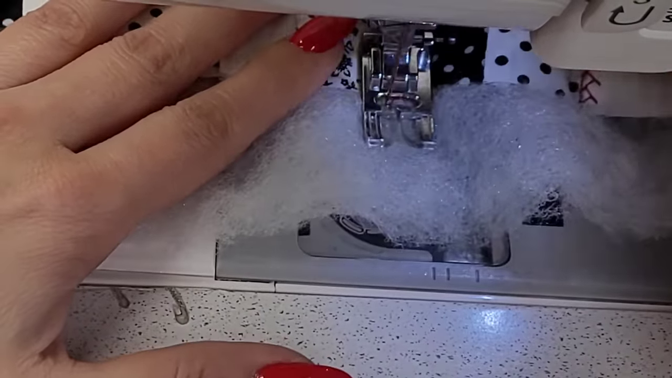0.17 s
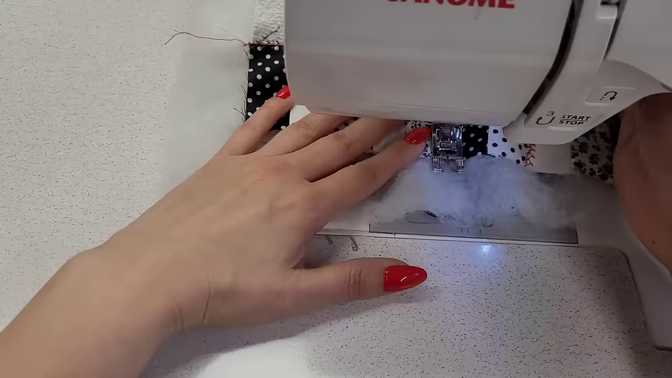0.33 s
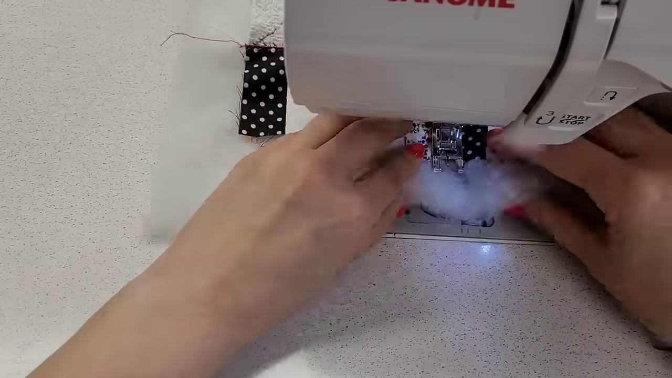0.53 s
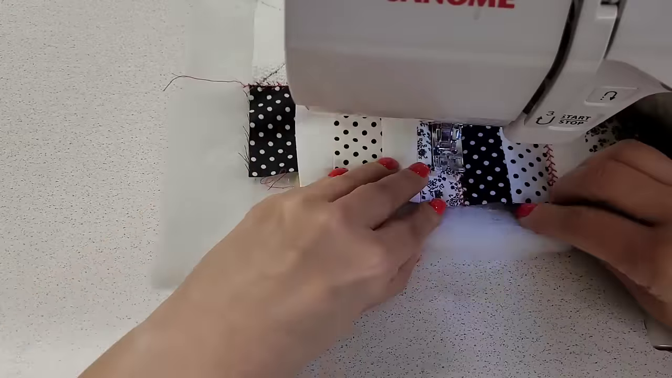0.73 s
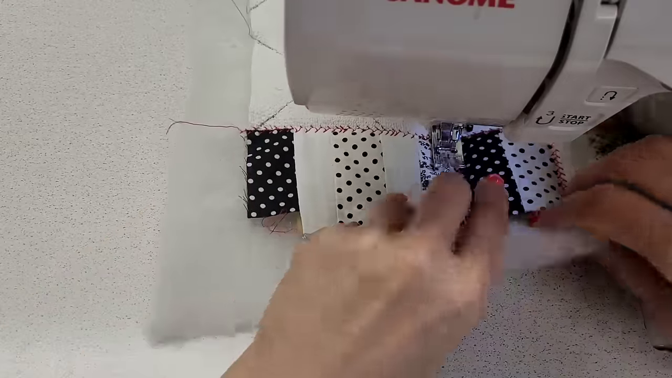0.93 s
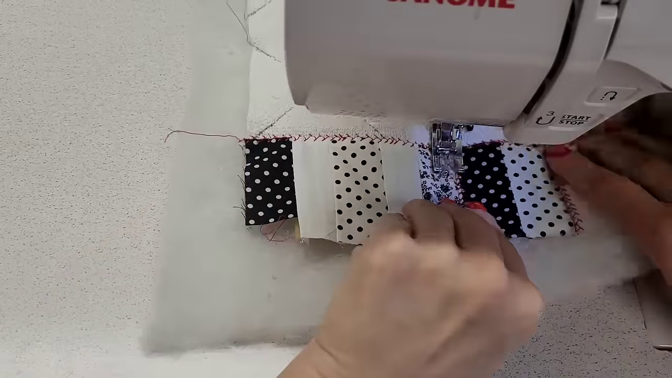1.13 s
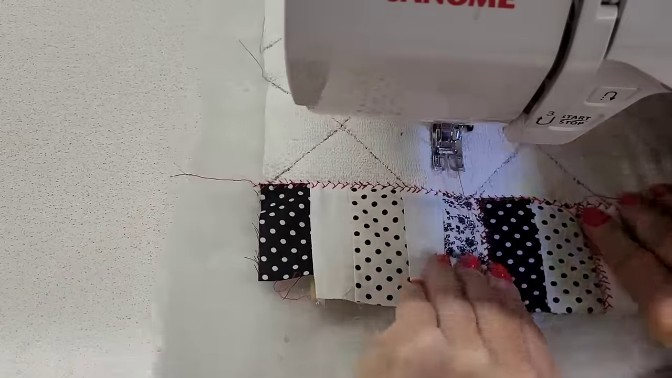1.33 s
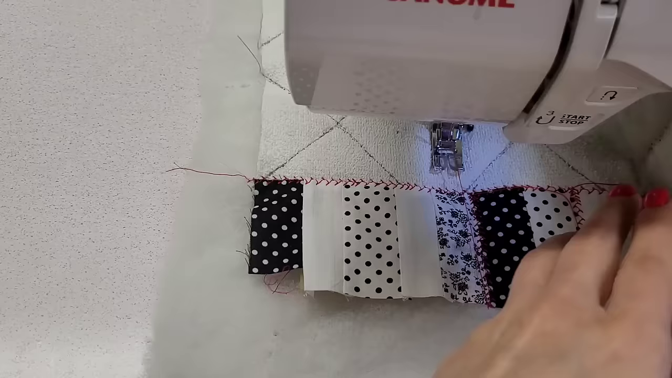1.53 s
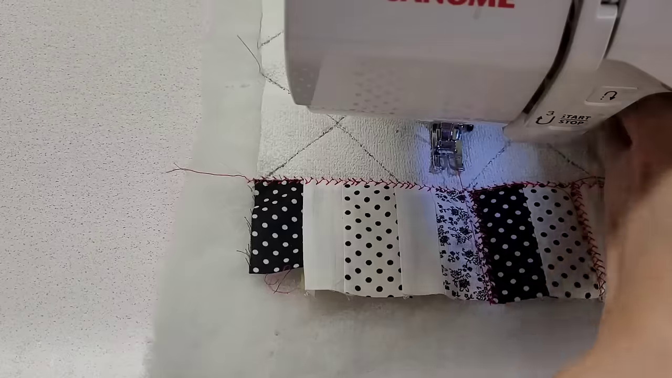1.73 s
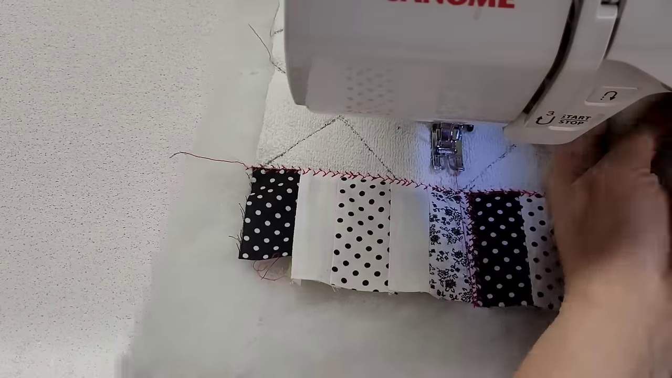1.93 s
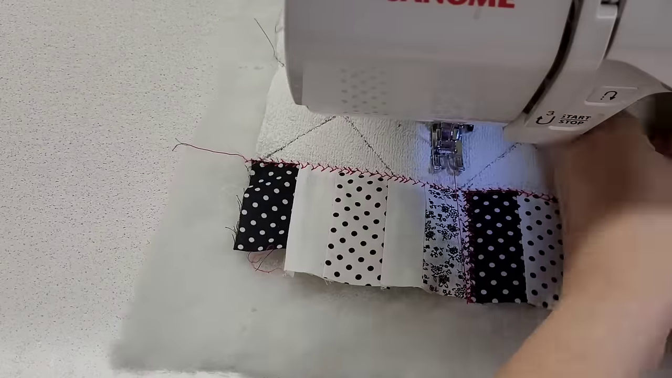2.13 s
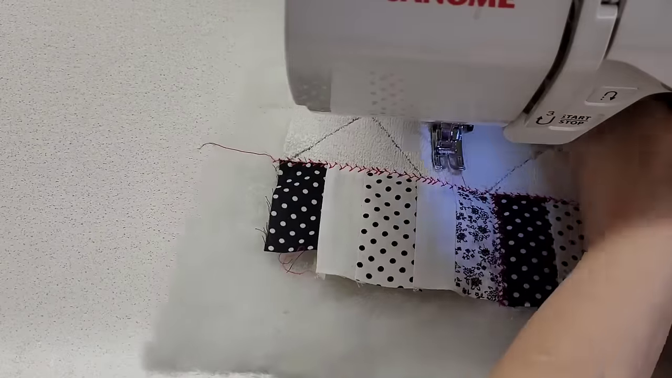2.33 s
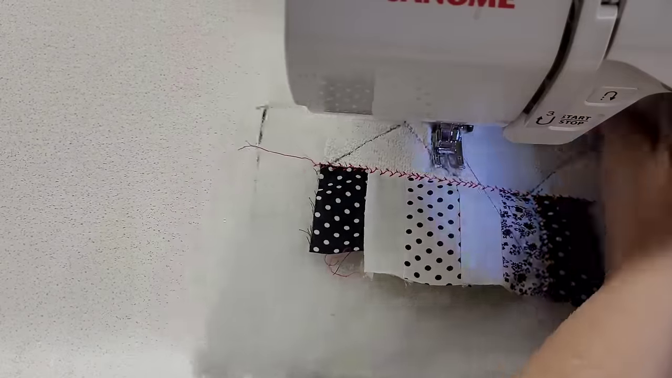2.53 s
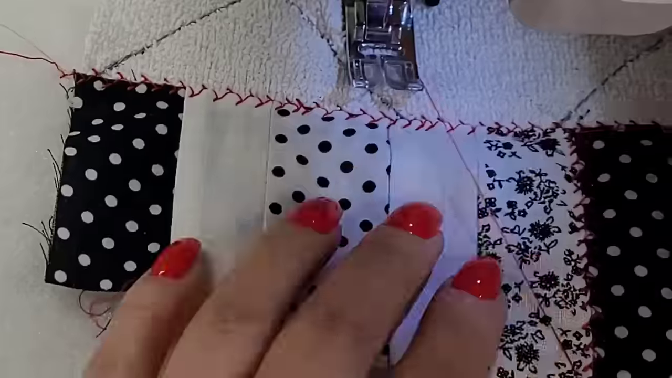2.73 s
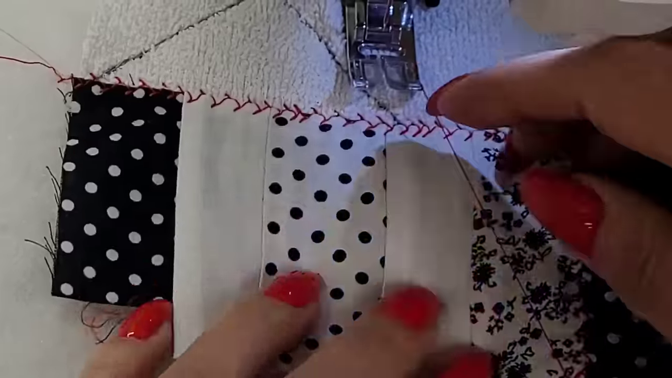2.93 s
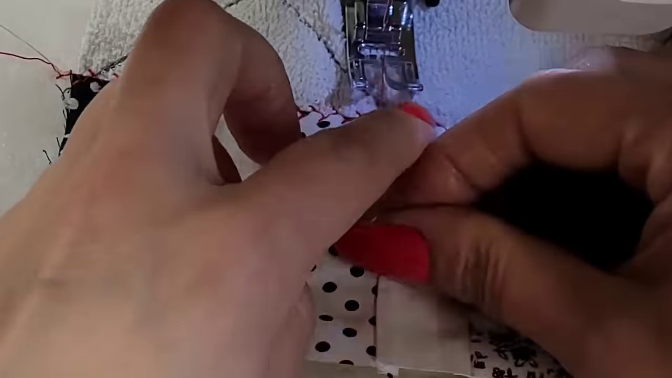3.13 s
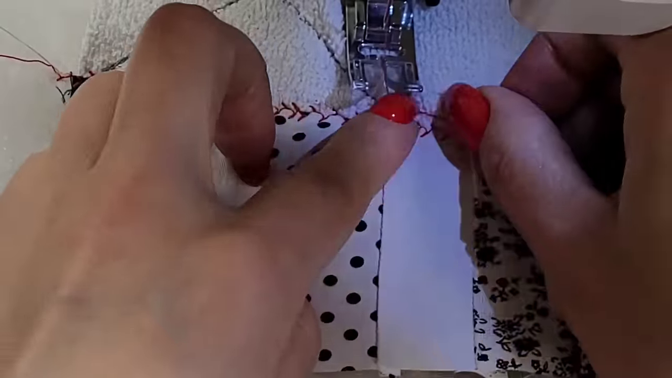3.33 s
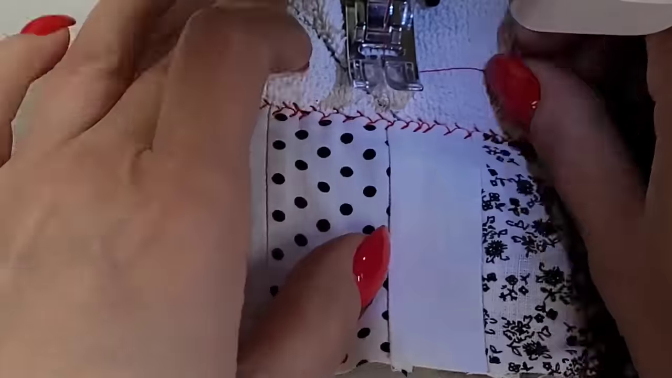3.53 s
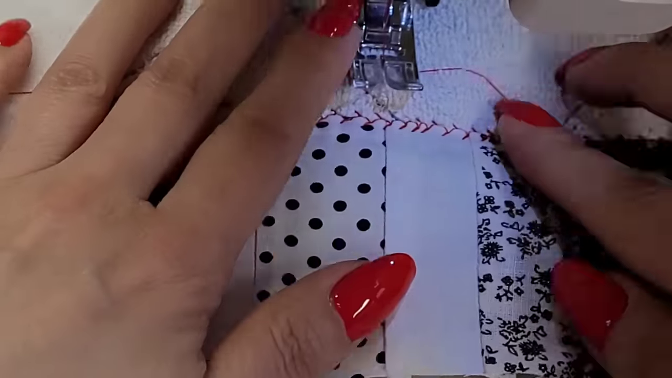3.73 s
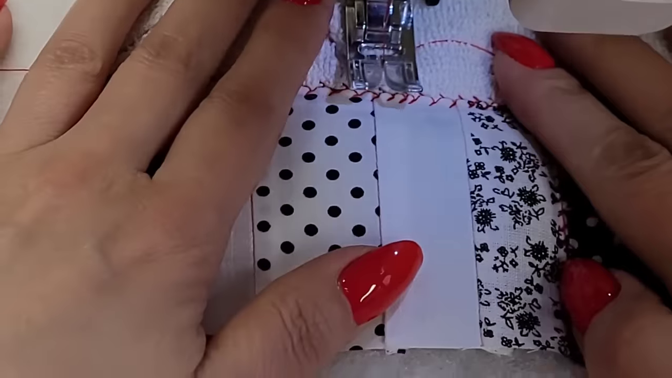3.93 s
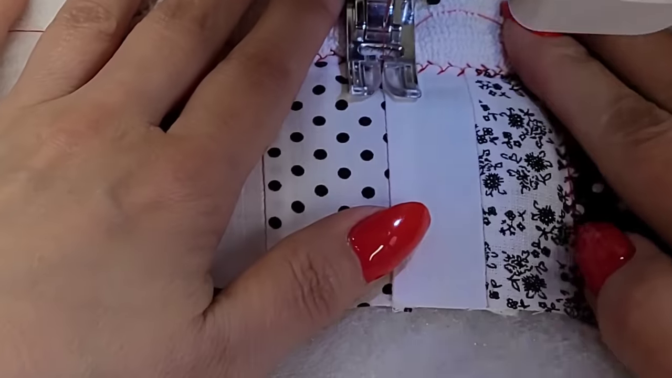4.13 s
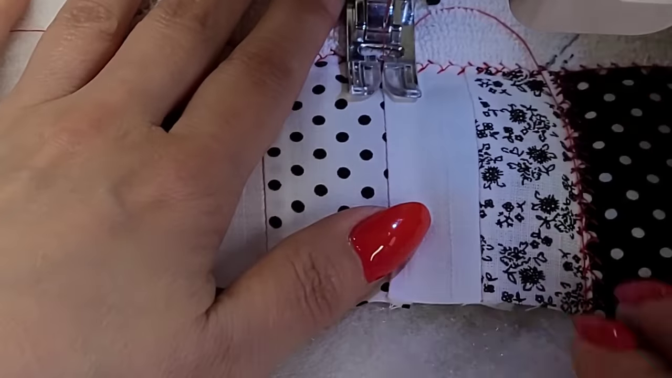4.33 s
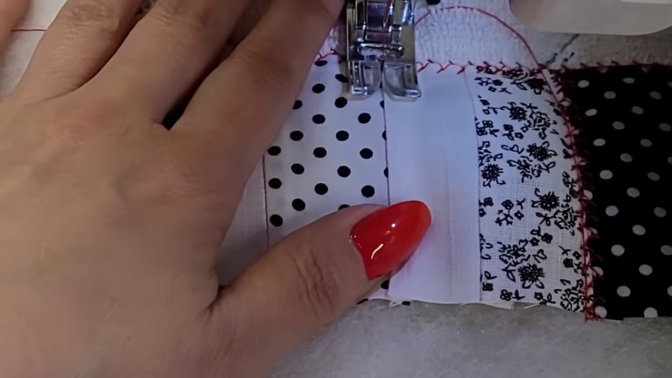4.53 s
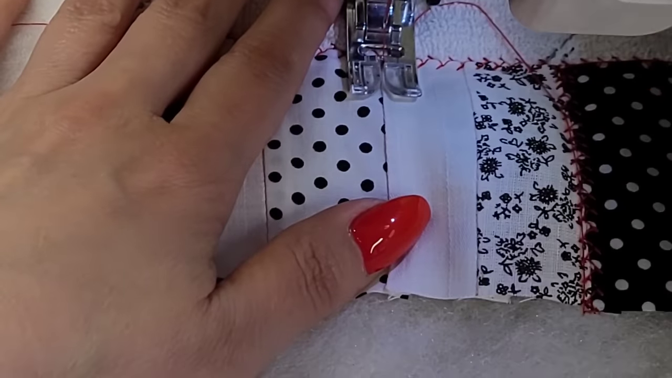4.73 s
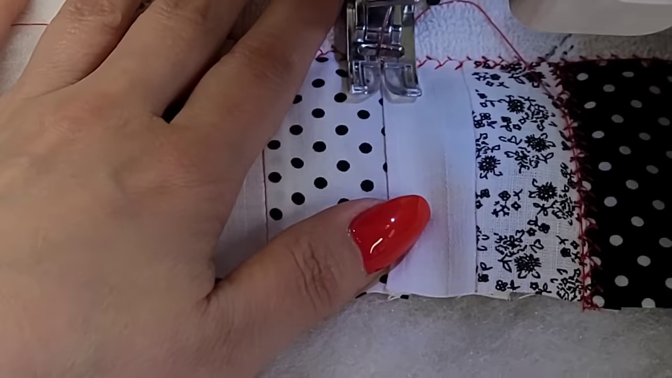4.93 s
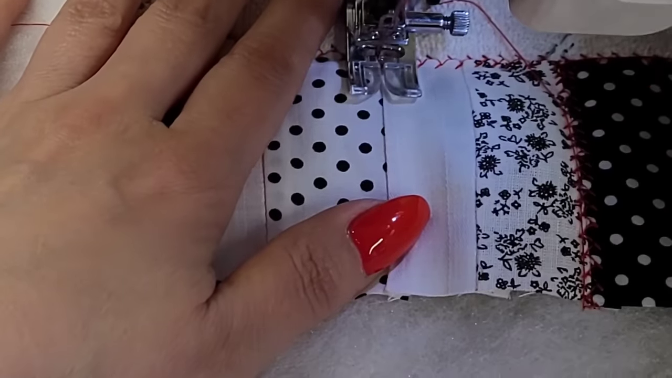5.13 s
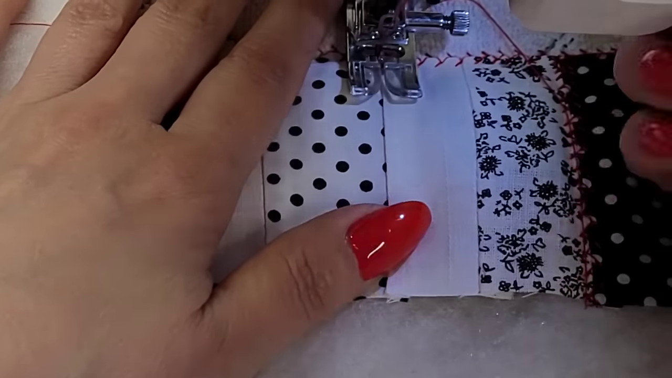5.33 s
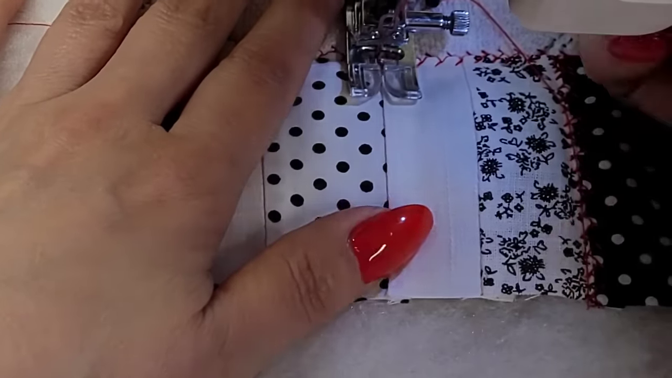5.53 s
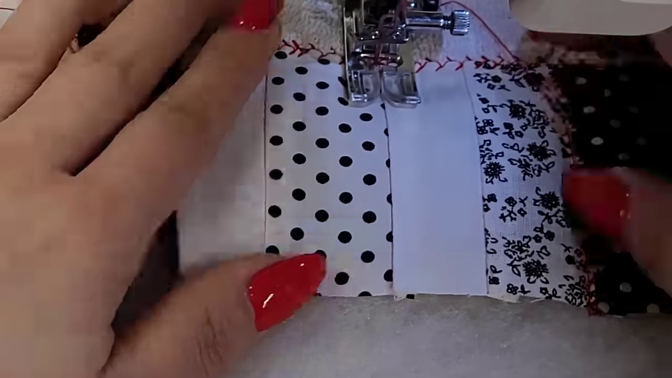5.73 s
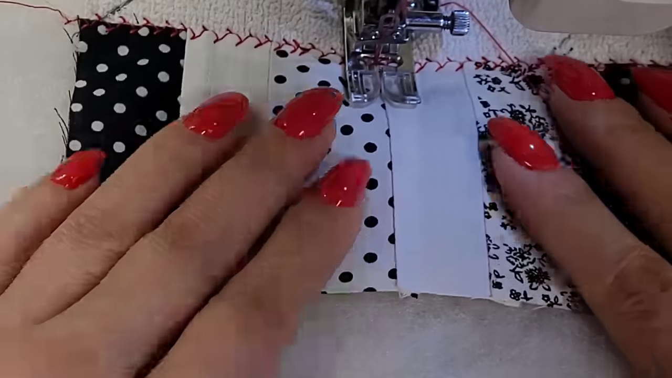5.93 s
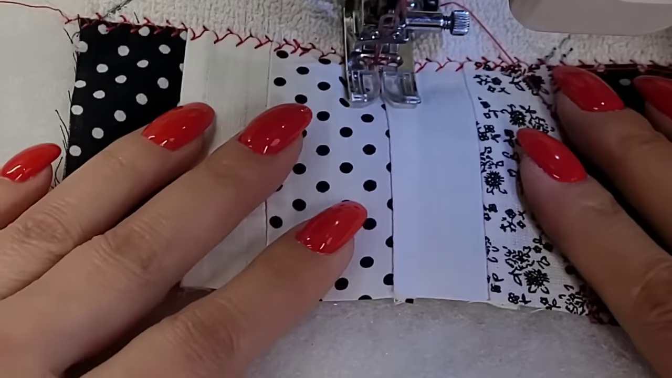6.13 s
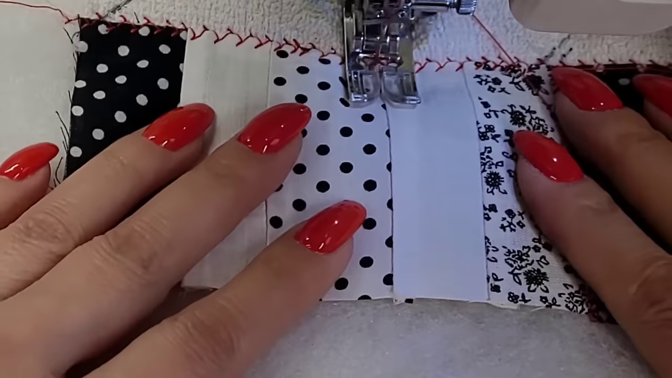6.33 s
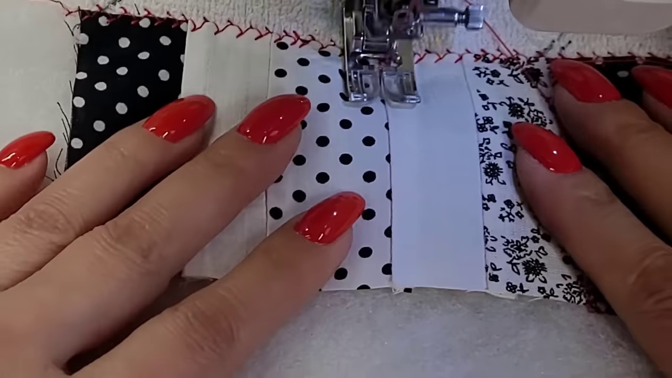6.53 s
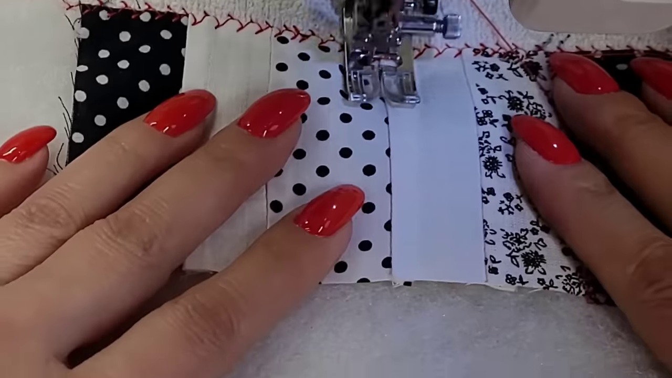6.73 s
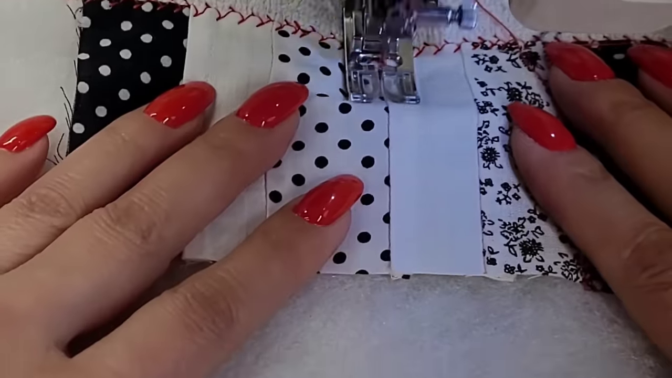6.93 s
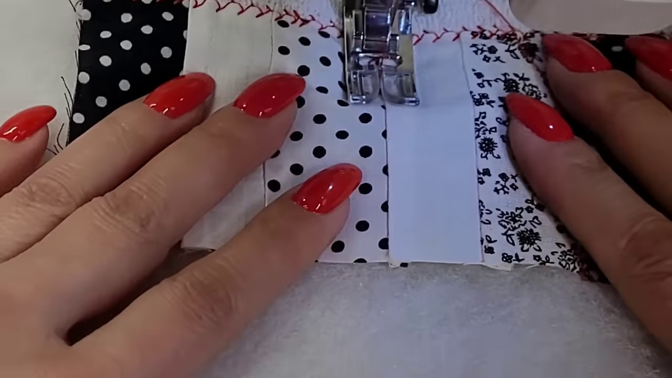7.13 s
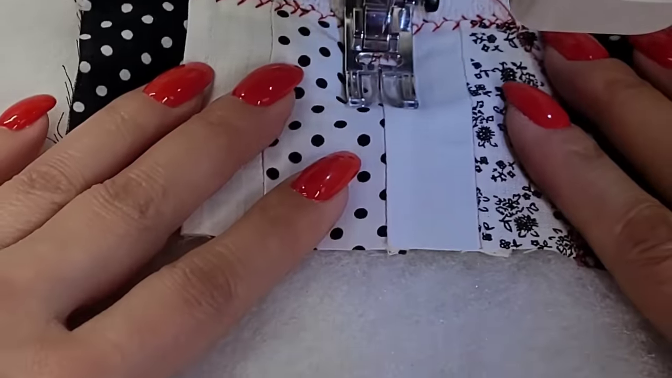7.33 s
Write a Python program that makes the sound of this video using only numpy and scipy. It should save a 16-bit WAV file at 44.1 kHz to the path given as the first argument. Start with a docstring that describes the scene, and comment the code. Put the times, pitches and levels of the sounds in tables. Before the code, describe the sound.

Close-up cloth scrapes, hard plastic and metal taps, a loud lever snap, then a domestic sewing machine clattering into steady stitching.

```python
"""A domestic sewing machine on a desk in a quiet room, heard from close by.
First hands drag a thick towel over the bed (friction noise in swelling pulls), while nails, levers and
the presser foot knock on the casing: impacts that ring its modes, with noise snaps and hard ticks.
A faint gliding sine hums from 3.3 s to 4.7 s; after 4 s the towel lies still between pulls. At 6.3 s the motor
engages with clunks: needle, feed and hook clatter over a noise-driven casing drone and a brief whine."""
import sys
import numpy as np
from scipy import signal
from scipy.io import wavfile

SR = 44100
rng = np.random.default_rng(int(sys.argv[2]) if len(sys.argv) > 2 else 0)


def materialize(psi):
    """Save the field psi as 16-bit PCM at rate SR to the path in sys.argv[1].

    A 1-D psi becomes a single channel; in a 2-D psi each row is a channel.
    """
    bounded = np.clip(np.atleast_2d(psi).T, -1, 1)
    quanta = np.round(bounded * 32767).astype(np.int16)
    wavfile.write(sys.argv[1], SR, quanta)


N = 325458

# sharp knocks by nail, lever and foot; the last three are clunks as the motor engages:
# [t/s, snap level/dB, casing thud level/dB, thud pitch f/Hz, brightness level/dB, snap t60 t/s,
# metal ring pitch f/Hz]
SHARP_KNOCKS = [(0.0094, -49, -37.5, 260, -14, 0.033, 1310), (0.2197, -52, -26.5, 301, -15, 0.091, 1390),
                (0.2764, -44, -41, 262, -14.5, 0.079, 1244), (0.319, -43, -34, 224, -12.5, 0.085, 1280),
                (0.3823, -65, -52, 458, -20, 0.12, 1250), (0.5234, -33, -39.5, 357, -13, 0.11, 1185),
                (0.5425, -38.5, -40.5, 387, -22, 0.066, 1290), (0.5726, -43, -35, 350, -21, 0.052, 1290),
                (0.7091, -49, -44, 284, -14, 0.31, 1400), (0.8949, -23.5, -37, 400, -15.5, 0.07, 2430),
                (1.0631, -24.5, -27.5, 367, -14, 0.061, 5560),
                (1.0868, -34.5, -41, 520, -13.5, 0.064, 1280), (1.1575, -50, -43.5, 254, -11, 0.14, 2870),
                (1.3765, -28, -37.5, 354, -12, .083, 1555), (1.4509, -38.5, -44, 390, -24, 0.073, 1280),
                (1.516, -26, -27.5, 267, -7.5, 0.098, 4320), (1.524, -24, -27.5, 583, -13.5, 0.086, 1730),
                (1.546, -36.5, -39, 444, -3, .041, 1700), (1.5722, -45.5, -45, 331, 0, .04, 1900),
                (1.6986, -26.5, -39.5, 467, -14.5, .098, 2430), (1.7762, -49, -44.5, 416, -13, .063, 1450),
                (1.935, -22.5, -31.5, 466, -16.5, 0.066, 1216),
                (1.9922, -20.5, -37.5, 297, -9, 0.049, 4620), (2.165, -20.5, -28, 274, -12, 0.078, 2660),
                (2.276, -39, -60, 266, -4, 0.048, 5680), (2.3903, -42.5, -54, 340, -1, 0.036, 7650),
                (2.4635, -49.5, -51.5, 333, -3, 0.098, 1220), (2.748, -61.5, -46.5, 280, -32, 0.078, 1360),
                (2.849, -58, -51, 363, -14, 0.37, 1660), (2.996, -53, -73, 272, -4, 0.11, 4525),
                (3.3827, -45, -44, 285, -11, 0.027, 1360), (3.6005, -42, -45.5, 470, -3.5, 0.041, 5710),
                (3.6143, -45, -44.5, 304, -3, 0.097, 2620), (4.5454, -38, -49, 285, -1.5, 0.049, 6600),
                (4.696, -50, -50, 307, -14.5, 0.18, 1910), (4.715, -43, -50.5, 430, -3.5, 0.093, 4690),
                (4.7258, -50.5, -35.5, 246, -21.5, 0.051, 2720),
                (4.7573, -59, -48, 250, -15.5, 0.028, 2700), (4.9059, -35.5, -26, 616, -19, 0.089, 1220),
                (5.0067, -52.5, -41.5, 435, -26, 0.086, 1250), (5.0152, -53, -41, 263, -21, 0.067, 1270),
                (5.3386, -31, -38, 684, -12.5, .039, 4960), (5.3567, -22, -36, 630, -9.5, 0.038, 4880),
                (5.439, -54.5, -56.5, 437, -16.5, 0.097, 1500), (5.632, -48, -55, 496, -8, .05, 5600),
                (5.6493, -48, -41.5, 590, -15, .24, 1270), (5.671, -23.5, -20.5, 580, -12.5, .073, 3100),
                (5.683, -10, -30.5, 536, -3, 0.038, 6330), (6.2782, -64, -35, 261, -33, 0.14, 1240),
                (6.3066, -45.5, -30, 530, -36.5, 0.03, 1410), (6.39, -57, -25, 451, -31, 0.18, 1250)]
# needle bar, which turns twice a stitch, top and bottom in turn, and rebounds once: [t/s, snap level/dB,
# casing thud level/dB, thud pitch f/Hz, rebound delay t/s, rebound against the turn level/dB]
NEEDLE_TURNS = [(6.4511, -25, -27.5, 444, 0.011, -26), (6.478, -27.5, -31, 275, .012, -24),
                (6.542, -14, -30, 278, 0.017, -31), (6.5633, -31.5, -31, 290, .012, -23),
                (6.628, -20, -43, 266, 0.011, -24), (6.6565, -24, -27, 418, 0.015, 5),
                (6.728, -17.5, -33.5, 318, 0.011, -20), (6.744, -18.5, -28.5, 437, .0111, -2.5),
                (6.8114, -26, -38, 444, 0.01, -6), (6.8397, -23, -26, 444, .012, -16),
                (6.8958, -17.5, -27, 301, 0.0073, -30), (6.928, -26, -34, 303, .012, -2),
                (6.9791, -22, -36, 420, .012, -25), (7.0184, -23, -27, 477, 0.013, 3.2),
                (7.0682, -22, -20, 427, 0.0094, -7.5), (7.1126, -18, -30, 275, 0.016, -1),
                (7.1627, -17.5, -30, 590, 0.012, 4), (7.2028, -24, -42, 487, 0.013, -6),
                (7.2571, -21.5, -32, 427, .012, -11), (7.2972, -17, -21, 455, .012, -8),
                (7.3397, -17.5, -29, 299, 0.016, -3)]
# modes of the casing: [f/Hz, width f/Hz, level/dB]
CASING_MODES = [(256.6, 62.4, 0.5), (292.2, 44.2, 5.5), (338, 58.5, -1.5), (407.2, 28.5, -1),
                (434, 36.3, 1), (499.5, 34.5, 1), (561, 39.3, -4.5), (656, 37, -4.5), (790, 74, -13.5),
                (1011, 36, -14), (1210, 81, -19.5)]
# modes of foot, levers and needle bar: [f/Hz, width f/Hz, level/dB]
METAL_MODES = [(1235, 100, -10), (1420, 82, -5), (1698, 110, -6), (2350, 68, -15), (2670, 90, -19),
               (3175, 35, -5), (3930, 43, -6), (4450, 140, -10), (4776, 110, -1), (4870, 170, -11),
               (6700, 150, -8), (6520, 66, -13), (7060, 240, 4), (7500, 180, -11), (7800, 130, -11),
               (10400, 410, -4), (15600, 820, 8)]

PLAIN_BRIGHT_DB = -13   # brightness of a snap that has the plain spectrum
EDGES = 22 * 2 ** np.arange(0, 9.7, .4)   # noise band edges in Hz
CENTRES = np.sqrt(EDGES[1:] * EDGES[:-1])
STEP = 8   # samples per point of a snap envelope


def amp(db):
    """Level to amplitude: 20 dB are a factor of ten."""
    return 10 ** (np.asarray(db) / 20)


def rms_one(x):
    """Normalisation by mean power: scaled to rms 1."""
    return x / np.sqrt(np.mean(x ** 2) + 1e-20)


def in_time(rows):
    """Linear interpolation: each column as a curve over all samples."""
    s, *columns = np.transpose(rows)
    return [np.interp(np.arange(N) / SR, s, c) for c in columns]


def while_sounding(rows):
    """Gating: 1 between the first and last row, with 10 ms ramps."""
    first, last = rows[0][0], rows[-1][0]
    return np.interp(np.arange(N) / SR, [first - .01, first, last, last + .01], [0, 1, 1, 0])


def at_hz(points, hz):
    """Interpolation of a spectrum on a log-frequency axis."""
    return np.interp(np.log(hz), np.log(np.array(points)[:, 0]), np.array(points)[:, 1])


def drift(rate_hz):
    """Low-passed noise: a slow random fluctuation of spread 1."""
    hop = 40   # samples between computed points
    r = np.exp(-2 * np.pi * hop * rate_hz / SR)
    white = rng.standard_normal(N // hop + 2002)
    slow = signal.lfilter([1], [1, -2 * r, r * r], white)[2000:]   # settled part only
    return np.interp(np.arange(N) / hop, np.arange(len(slow)), rms_one(slow))


def resonance(x, hz, width_hz):
    """A damped mode: two-pole peak of gain 1."""
    r = np.exp(-np.pi * width_hz / SR)
    poles = [1, -2 * r * np.cos(2 * np.pi * hz / SR), r * r]
    return signal.lfilter([(1 - r * r) / 2, 0, (r * r - 1) / 2], poles, x)


def stereo(mid, side, hz):
    """Interaural coherence and level difference: left and right as alike and balanced as at this frequency."""
    # likeness of left and right: [f/Hz, correlation]
    likeness = [(60, 0.94), (250, 0.95), (600, 0.72), (1200, 0.31), (3000, 0.11), (12000, 0.4)]
    # the machine stands to the right, its treble shaded on the left: [f/Hz, left-right level/dB]
    balance = [(60, 2.5), (110, 2), (200, -2), (380, -1.5), (700, 0.5), (1290, -3), (2380, -3.0),
               (4400, -6), (8120, -3.5), (15000, -7.5)]
    alike, lean_db = np.clip(at_hz(likeness, hz), 0, 1), at_hz(balance, hz)
    pair = np.sqrt(1 + alike) * mid + np.sqrt(1 - alike) * side * [[1], [-1]]
    return pair * amp([[lean_db / 2], [-lean_db / 2]])


def noise_bands():
    """Filter-bank analysis: stereo noise split into bands, flat per Hz."""
    white = rng.standard_normal((2, 2, N))   # neighbouring bands draw on different noise
    cut = [signal.butter(2, edge, "band", fs=SR, output="sos") for edge in zip(EDGES, EDGES[1:])]
    return [stereo(*signal.sosfilt(sos, white[k % 2]), CENTRES[k]) for k, sos in enumerate(cut)]


def shares(spectrum):
    """Division of power by bandwidth: band gains that give the spectrum at rms 1."""
    gain = amp(at_hz(spectrum, CENTRES))
    return gain / np.sqrt(np.sum(gain ** 2 * np.diff(EDGES)) * 4 / SR)


def pings(s, level_db):
    """Impulse excitation: one click per blow."""
    out = np.full(N, 1e-18)
    out[(np.asarray(s) * SR).astype(int)] = amp(level_db)
    return out


def single_blows():
    """Single impacts: the sharp knocks, each with its ring dB against the snap as a last column."""
    # ring against a snap of -35 dB, and dB it gains per dB of snap
    ring_db, ring_share = -15, -0.083
    return [(*row, ring_db + ring_share * (row[1] + 35)) for row in SHARP_KNOCKS]


def mechanism():
    """Periodic impact: needle turns, rebounds and feed steps as blows, columns as the single blows."""
    # a turn's sound, top then bottom: [brightness level/dB, snap t60 t/s, metal ring pitch f/Hz,
    # ring against the snap level/dB]
    turn_sound = [(-17.5, 0.047, 4300, -21), (-16.5, 0.066, 4400, -18.5)]
    # a feed step's sound: columns as the turns
    feed_sound = (-16, -1.5, 4400, -23)
    # the feed steps after each bottom turn, and is heard less once the machine runs
    feed_delay_s, feed_snap_db, feed_thud_db = .032, -26, -29
    feed_hz, feed_fade_db_per_s = 286, -18
    blows = []
    for k, (s, snap_db, thud_db, thud_hz, delay, rebound_db) in enumerate(NEEDLE_TURNS):
        sound = turn_sound[k % 2]
        blows.append((s, snap_db, thud_db, thud_hz, *sound))
        blows.append((s + delay, snap_db + rebound_db, thud_db + rebound_db, thud_hz, *sound))
        if k % 2:
            fade_db = feed_fade_db_per_s * (s - NEEDLE_TURNS[0][0])
            blows.append((s + feed_delay_s, feed_snap_db + fade_db, feed_thud_db + fade_db,
                          feed_hz, *feed_sound))
    return blows


def snap_envelopes(rows, spectrum, crack_db, crest_db, rise_s, tail_db=-31.5, tail_t60=0.2):
    """Frequency-dependent damping: power of a crack, a rattle dying faster in the treble, the room's tail."""
    count = 1400
    power = np.zeros((len(CENTRES), N // STEP + 2000))
    age = np.arange(count) * STEP / SR
    octaves, rise = np.log2(CENTRES / 4500)[:, None], (1 - np.exp(-age / rise_s)) ** 2
    for s, peak_db, _, _, bright_db, t60, _, _ in rows:
        t60_band = max(t60, .01) * 2 ** (-.35 * octaves)   # as listed at 4500 Hz
        tilt_db = (bright_db - PLAIN_BRIGHT_DB) * 0.7 * np.clip(octaves, -1.5, 1.5)
        level = shares(spectrum)[:, None] * amp(peak_db - crest_db + tilt_db)
        crack = crack_db - 60 * age / 0.009
        rattle = -60 * age / t60_band
        tail = tail_db - 60 * age / tail_t60
        at = int(s * SR / STEP)
        power[:, at:at + count] += level ** 2 * rise * (amp(crack) ** 2 + amp(rattle) ** 2 + amp(tail) ** 2)
    return power


def knock_envelopes(single):
    """Broadband impact noise: band power of the sharp knocks' snaps."""
    # [f/Hz, level per Hz/dB]
    snap_spectrum = [(470, -9.5), (800, -3), (2180, -6), (2870, -5.5), (6970, -12), (9100, -11),
                     (11400, -14.5), (15100, -25.5), (16500, -39)]
    return snap_envelopes(single, snap_spectrum, crack_db=0.5, crest_db=11.5, rise_s=0.00054)


def contact_envelopes(by_machine):
    """Broadband impact noise: band power of the mechanism's snaps."""
    # [f/Hz, level per Hz/dB]
    clatter_spectrum = [(470, -14), (800, -6), (2730, -19), (3940, -9), (5920, -21.5), (7150, -9),
                        (12800, -15.5), (15300, -25), (16500, -32)]
    return snap_envelopes(by_machine, clatter_spectrum, crack_db=4.5, crest_db=14.5, rise_s=0.0011)


def strike(modes, s, level_db, pitch_hz, reach, far_db, contact_hz):
    """Modal excitation: a blow rings all modes, most those near the struck pitch; long contacts are dull."""
    under_db_per_octave = -4   # modes below the place struck answer less
    at, out = (s * SR).astype(int), np.zeros((2, N))
    chance = rng.normal(0, 1, (len(s), len(modes), 2))
    for k, (hz, width, db) in enumerate(modes):
        near_db = -9 * (np.log(hz / pitch_hz) / reach) ** 2
        under_db = under_db_per_octave * np.clip(np.log2(pitch_hz / hz), 0, 1)
        mode_db = np.maximum(near_db, db + far_db + under_db)
        strength = amp(level_db + mode_db + 2.5 * chance[:, k, 0])
        push = np.full((2, N), 1e-18)
        push[0, at], push[1, at] = strength, strength * chance[:, k, 1]
        out += (-1) ** k * stereo(*resonance(push, hz, width), hz) * SR / (np.pi * width)
    r = np.exp(-2 * np.pi * contact_hz / SR)
    return signal.lfilter([(1 - r) ** 2], [1, -2 * r, r * r], out)


def thuds_and_rings(blows, single_count):
    """Modal ringing: blows and bumps sound the casing, blows the metal parts."""
    # dull bumps of palm and cloth on the casing: [t/s, thud level/dB, thud pitch f/Hz]
    palm_bumps = [(0.032, -35, 390), (0.1592, -42, 244), (0.2074, -39, 480), (0.3588, -36, 238),
                  (1.0154, -48.5, 262), (1.747, -39.5, 517), (2.6927, -41.5, 265), (3.1472, -55, 300),
                  (3.3098, -47, 260), (4.9684, -40, 280), (4.994, -35, 370), (5.457, -45, 302),
                  (5.5298, -51, 581), (5.583, -47, 543), (5.61, -44, 543)]
    ring_spread = 0.11   # ring pitch of the mechanism's blows varies at random: spread of log pitch
    s, snap_db, thud_db, thud_hz, _, _, ring_hz, ring_db = np.transpose(blows)
    ring_hz[single_count:] *= np.exp(ring_spread * rng.normal(0, 1, len(s) - single_count))
    struck = np.c_[[s, thud_db, thud_hz], np.transpose(palm_bumps)]
    thuds = strike(CASING_MODES, *struck, reach=0.23, far_db=-11.0, contact_hz=430)
    # a small casing radiates little bass
    thuds = signal.sosfilt(signal.butter(2, 215, "high", fs=SR, output="sos"), thuds)
    rings = strike(METAL_MODES, s, snap_db + ring_db, ring_hz, reach=0.033, far_db=-22.5, contact_hz=11900)
    return thuds + rings


def ticks_and_thumps():
    """Short contacts excite treble, heavy ones the desk: hard ticks, and the desk's low answer."""
    # blows that go through to the desk: [t/s, drive level/dB]
    desk_blows = [(0.219, -51), (1.062, -52), (1.52, -62), (1.934, -46), (2.166, -41), (4.726, -48),
                  (4.909, -38), (4.994, -44), (5.355, -53)]
    thump_hz, thump_width_hz, tick_hz = 147, 55, 5000
    knock_tick_db, contact_tick_db = -5.5, -5   # against the snap, before the terms below
    tick_share = 0.77   # hard contacts tick the more: dB gained per dB of snap
    s, snap_db, _, _, bright_db, _, _ = np.transpose(SHARP_KNOCKS)
    ticks = pings(s + 0.0033, snap_db + knock_tick_db + .6 * (bright_db - PLAIN_BRIGHT_DB))
    s, snap_db, *_ = np.transpose(mechanism())
    ticks = ticks + pings(s + 0.0013, snap_db + contact_tick_db + tick_share * (snap_db + 18))
    ticks = signal.sosfilt(signal.butter(2, tick_hz, "high", fs=SR, output="sos"), ticks)
    thumps = resonance(pings(*np.transpose(desk_blows)), thump_hz, thump_width_hz)
    thumps = resonance(thumps, thump_hz, 0.5 * thump_width_hz) * SR / (np.pi * thump_width_hz)
    return stereo(ticks, 0 * ticks, 8000) + stereo(thumps, 0 * thumps, thump_hz)


def metal_ring(rattle, share_db):
    """Forced resonance: running gears and contacts keep the metal modes ringing."""
    ring = sum(amp(db) * resonance(rattle, hz, width) for hz, width, db in METAL_MODES)
    return rattle + amp(share_db) * ring


def pulls():
    """Sliding friction: hiss, scrape and rumble gains of pulls that swell, sag and stop."""
    # pulls of the towel over the bed: [start t/s, strongest t/s, end t/s, hiss level/dB,
    # dull scrape level/dB, rumble through the casing level/dB]
    towel_pulls = [(-.05, 0, 0.12, -99, -88, -45.5), (0.207, 0.25, .33, -68.5, -83, -44),
                   (.33, 0.412, 0.42, -68.5, -85, -43), (0.49, 0.525, 0.62, -66, -75, -61),
                   (0.642, 0.772, 0.82, -63.5, -66, -48.5), (1.133, 1.257, 1.382, -60, -67, -52.5),
                   (1.67, 1.875, 1.91, -70.5, -70.5, -63.5), (1.91, 2.14, 2.14, -62.5, -63.5, -59),
                   (2.227, 2.362, 2.48, -61.5, -64, -56.5), (2.505, 2.57, 2.69, -70.5, -74.5, -58.5),
                   (2.712, 2.723, 3.03, -72.5, -73.5, -64), (2.848, 2.866, 2.98, -68, -76, -63),
                   (2.963, 3.06, 3.24, -72, -79, -75), (3.37, 3.395, 3.55, -73.5, -79, -70.5),
                   (3.556, 3.627, 3.67, -68.5, -76.5, -63), (3.696, 3.74, 4.1, -78, -85, -80),
                   (3.851, 4, 4.065, -71, -66, -59.5), (4.1, 4.152, 4.16, -78, -78.5, -64.5),
                   (4.225, 4.243, 4.35, -83, -85.5, -80), (4.338, 4.42, 3.8, -99, -85, -77.5),
                   (4.528, 4.573, 4.64, -77.5, -77, -74.5), (4.763, 4.815, 4.86, -95, -97, -63),
                   (4.93, 5.04, 4.58, -87, -96, -64), (5.278, 5.36, 5.5, -74.5, -78, -65),
                   (5.607, 5.728, 5.84, -72.5, -71.5, -66), (5.89, 6.01, 6.1, -78, -82.5, -77.5)]
    # stirring between pulls: [hiss level/dB, scrape level/dB, rumble level/dB]
    stirring_db = (-82.5, -87.5, -75.5)
    # change of each once the towel lies still: [hiss level/dB, scrape level/dB, rumble level/dB]
    settled_db = (-22.5, -11, -11)
    still_s, settle_s = 4.01, .3
    start_db, end_db, stop_s = -10.5, -8, 0.018   # against the strongest moment; time to fall silent
    t = np.arange(N) / SR
    settling = np.clip((t - still_s) / settle_s, 0, 1)
    power = (amp(stirring_db)[:, None] * amp(np.array(settled_db)[:, None] * settling)) ** 2
    for start, top, end, *levels_db in towel_pulls:
        shape_db = np.interp(t, [start - stop_s, start, top, end, end + stop_s],
                             [-40, start_db, 0, end_db, -40], -99, -99)
        power = power + amp(levels_db)[:, None] ** 2 * amp(2 * shape_db)
    return np.sqrt(power)


def towel_spectra():
    """Spectral shaping of friction noise: band gains of the cloth's hiss and its dull scrape."""
    # [f/Hz, level per Hz/dB]
    cloth_spectrum = [(1290, -34.5), (2200, -8.5), (3940, -2), (5800, -7), (12200, -8.5), (15700, -13.5),
                      (16100, -14), (16500, -35)]
    # [f/Hz, level per Hz/dB]
    scrape_spectrum = [(500, -20), (750, 1), (1050, -12), (1400, -4), (1850, -10), (2500, -11),
                       (3500, -26.5)]
    return shares(cloth_spectrum), shares(scrape_spectrum)


def bed_plate(dull):
    """Friction-driven resonance: scrape noise sets the plate's modes singing, each coming and going."""
    # modes of the bed plate: [f/Hz, width f/Hz, against the scrape level/dB]
    plate_modes = [(900, 220, -6.5), (1350, 280, -7), (1748, 420, -4.5), (2090, 320, -11)]
    force = rng.standard_normal((2, N))
    song = np.zeros((2, N))
    for hz, width, db in plate_modes:
        mode = resonance(resonance(force, hz, width), hz, width)
        song += amp(db + 4.17 * drift(5)) * rms_one(stereo(*mode, hz))
    return dull * song


def motor():
    """Exponential spin-up, then a slow creep: gains of casing drone, desk shake and gear hiss."""
    # drone, shake, gears: [level at speed/dB, added level at the start/dB]; the shake is then
    # raised by each jolt and divided by the jolt's gain
    running = [(-33, -31.5), (-43.5, -3.5), (-49.5, -54)]
    start_s, spin_up_s, creep_db_per_s = 6.287, 0.094, 4.0
    jolt_db, jolt_t60_s = 7.5, 0.37   # each top turn jolts the desk
    age = np.arange(N) / SR - start_s
    on, age = np.clip(age / .01, 0, 1), np.maximum(age, 0)
    drone, shake, gears = [on * amp(db + short_db * np.exp(-age / spin_up_s) + creep_db_per_s * age)
                           for db, short_db in running]
    jolts = np.zeros(N)
    jolts[(np.array(NEEDLE_TURNS)[::2, 0] * SR).astype(int)] = amp(jolt_db)
    jolting = signal.lfilter([1], [1, -amp(-60 / (jolt_t60_s * SR))], jolts + 1e-18)
    return drone, shake * (1 + jolting) / amp(jolt_db), gears


def motor_spectra():
    """Spectral shaping of machine noise: band gains of gear hiss and of the desk's shake."""
    # [f/Hz, level per Hz/dB]
    gear_spectrum = [(410, -27), (700, -2), (1490, -7.5), (1680, -3), (2810, -10.5), (4580, -8),
                     (5580, -35), (7170, -16), (15000, -35), (15900, -27), (16500, -46)]
    # [f/Hz, level per Hz/dB]
    desk_spectrum = [(30, -21), (70, -14), (124, 13.5), (165, 6.5), (230, 5.5), (400, -35)]
    return shares(gear_spectrum), shares(desk_spectrum)


def casing_drone(lumpy_db):
    """Forced vibration: uneven noise through every casing mode, at rms 1."""
    force = rng.standard_normal((2, N)) * amp(lumpy_db * drift(47))
    return rms_one(sum((-1) ** k * amp(db) * stereo(*resonance(force, hz, width), hz)
                       for k, (hz, width, db) in enumerate(CASING_MODES)))


def chatter(gear):
    """Random impacts: loose parts tick unevenly while running and ring the metal modes."""
    per_s, level_db, spread_db = 280, -7.5, 5.5   # level against the gear hiss
    struck = rng.random(N) < per_s / SR
    strength = amp(spread_db * np.minimum(rng.exponential(1, N), 4))
    ticks = struck * strength * rng.normal(0, 1, (2, N))
    rung = sum(amp(db) * stereo(*resonance(ticks + 1e-18, hz, 3.5 * width), hz)
               for hz, width, db in METAL_MODES)
    return rms_one(rung) * gear * amp(level_db)


def whine():
    """Resonance crossed in passing: narrow noise comes up while the motor passes one speed."""
    # [t/s, level/dB]
    whine_levels = [(6.6, -57), (6.68, -47), (6.78, -43.5), (6.84, -35), (6.9, -52), (6.97, -51),
                    (7.05, -60)]
    whine_hz, width_hz = 1668, 30
    level_db = in_time(whine_levels)[0] + 3.5 * drift(35)
    tone = rms_one(resonance(rng.standard_normal(N), whine_hz, width_hz))
    return tone * amp(level_db) * while_sounding(whine_levels)


def hum():
    """Frequency glide by phase integration: a faint wavering sine rises in pitch, swells and fades."""
    start_s, end_s, attack_s = 3.33, 4.72, 0.057
    start_hz, glide_hz, glide_s = 149, 23.8, 0.32
    level_db, fade_db_per_s, waver_db = -57.5, -11, 2   # level as rms
    t = np.arange(N) / SR
    age = np.maximum(t - start_s, 0)
    hz = start_hz + glide_hz * (1 - np.exp(-age / glide_s))
    on = np.clip(np.minimum(age, end_s - t) / attack_s, 0, 1)
    gain = on * amp(level_db + fade_db_per_s * age + waver_db * drift(3.1))
    return np.sqrt(2) * gain * np.sin(2 * np.pi * np.cumsum(hz) / SR)


def room_gains():
    """Background noise: per band, a rumble of changing level and tilt below a steady hiss."""
    # room rumble: [t/s, level/dB, tilt level per octave/dB]
    rumble = [(0, -43, -3), (.3, -56, 7.5), (.6, -53.5, -3), (.9, -50, -8), (1.25, -56.5, 2.5),
              (1.7, -60, 5.5), (2.4, -58.5, 4), (2.9, -53.5, -6.5), (3.3, -57, 3), (4.2, -55.5, -3),
              (4.8, -54.5, 1), (5.35, -53, -1.5), (5.62, -56, -1.5), (5.75, -62, 4), (6.1, -68.5, 2.5),
              (6.21, -52.5, -8.5), (6.35, -58, 9), (6.55, -48.5, 6), (7.38, -45, -5)]
    # [f/Hz, level per Hz/dB]
    room_spectrum = [(12, -41), (20, -10), (63, 4), (102, -9), (174, -10.5), (230, -10), (281, -9),
                     (452, -37.5), (634, -37), (1350, -63.5), (2010, -50), (3720, -57), (11800, -53),
                     (16500, -71.5)]
    air_db, air_from_hz = -53.5, 900   # the hiss above this pitch stays steady
    level_db, tilt_db = in_time(rumble)
    for hz, share in zip(CENTRES, shares(room_spectrum)):
        if hz < air_from_hz:
            yield share * amp(level_db + tilt_db * np.clip(np.log2(hz / 90), 0, 1.5))
        else:
            yield share * amp(air_db)


def scene():
    """Superposition: blows, towel, motor and room are summed."""
    single, by_machine = single_blows(), mechanism()
    struck = thuds_and_rings(single + by_machine, len(single))
    knocks, contacts = knock_envelopes(single), contact_envelopes(by_machine)
    bounces = amp(2.2 * drift(200))   # loose parts touch several times within one snap
    hiss, dull, rub = pulls()
    fibres = amp(2.0 * drift(30) + 2.0 * drift(120))
    hiss, dull = hiss * fibres, dull * fibres
    drone, shake, gear = motor()
    teeth = gear * amp(4.6 * drift(33))
    cloth, scrape = towel_spectra()
    gears, desk = motor_spectra()

    steady, snaps, rattle = np.zeros((3, 2, N))
    for k, (band, room) in enumerate(zip(noise_bands(), room_gains())):
        power = (cloth[k] * hiss) ** 2 + (scrape[k] * dull) ** 2 + room ** 2 + (desk[k] * shake) ** 2
        steady += band * np.sqrt(power) * amp(0.69 * drift(30))
        # played backwards, the same noise serves the snaps as a separate source
        snaps += band[:, ::-1] * np.repeat(np.sqrt(knocks[k]), STEP)[:N] * bounces
        contact = np.repeat(np.sqrt(contacts[k]), STEP)[:N] * bounces
        # shifted by half the length, it serves the rattle as another
        rattle += np.roll(band, N // 2, axis=1) * np.hypot(gears[k] * teeth, contact)

    casing = casing_drone(lumpy_db=3.0) * rub + casing_drone(lumpy_db=1.5) * drone
    blows = struck + snaps + ticks_and_thumps()
    machine = metal_ring(rattle, share_db=1.5) + casing + whine() + chatter(gear)
    return blows + machine + bed_plate(dull) + hum() + steady


def record(dry):
    """Time-of-arrival difference and band limit: the left channel lags; the top is cut in two steps."""
    left_lag = 7   # samples
    soft_cut_hz, cutoff_hz = 15800, 16670
    late = np.stack([np.r_[np.zeros(left_lag), dry[0, :-left_lag]], dry[1]])
    soft = signal.sosfilt(signal.ellip(5, .5, 20, soft_cut_hz, fs=SR, output="sos"), late)
    return signal.sosfilt(signal.ellip(10, .5, 60, cutoff_hz, fs=SR, output="sos"), soft)


dry = scene()
out = record(dry)
materialize(out)
```